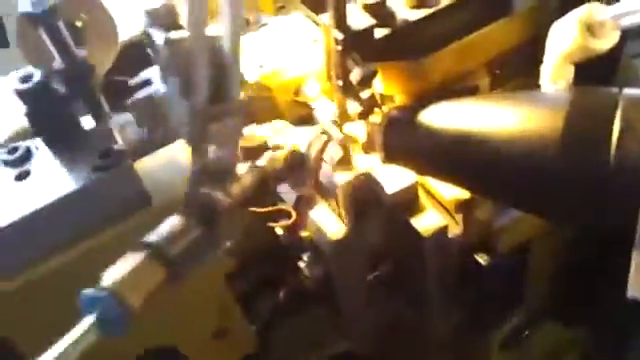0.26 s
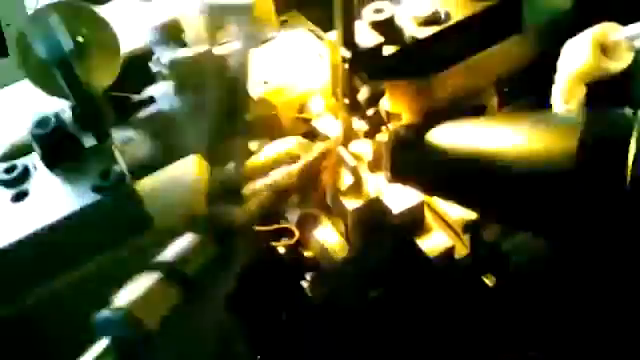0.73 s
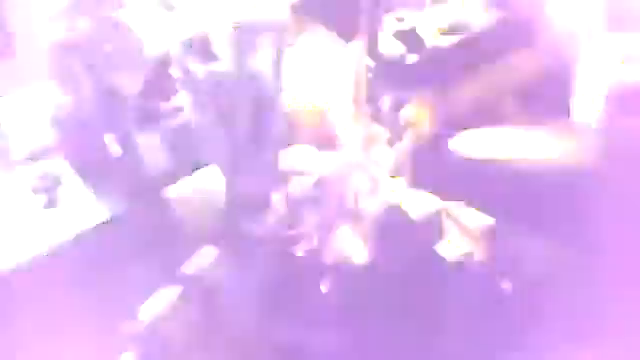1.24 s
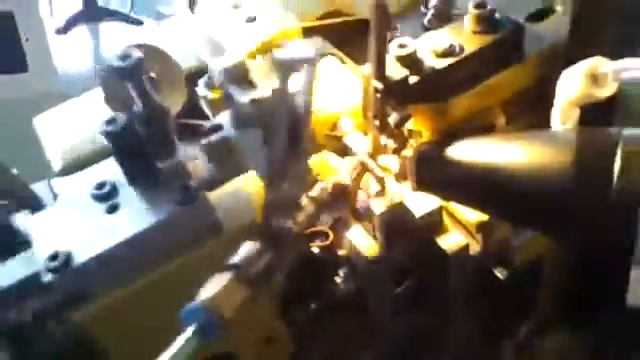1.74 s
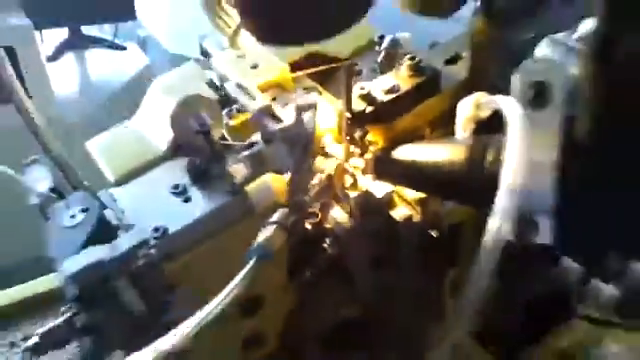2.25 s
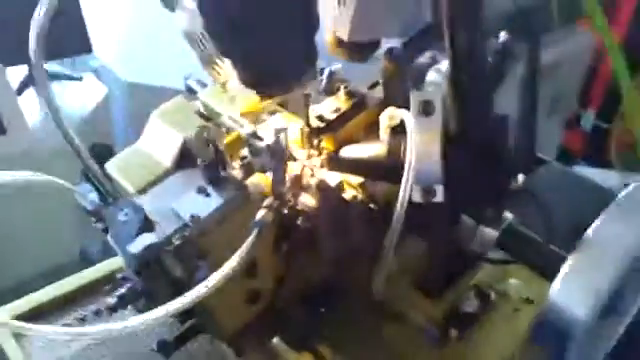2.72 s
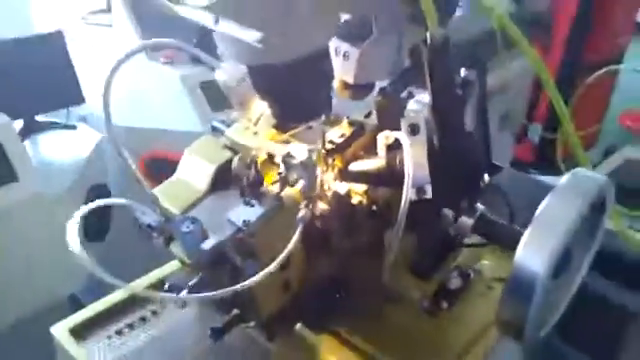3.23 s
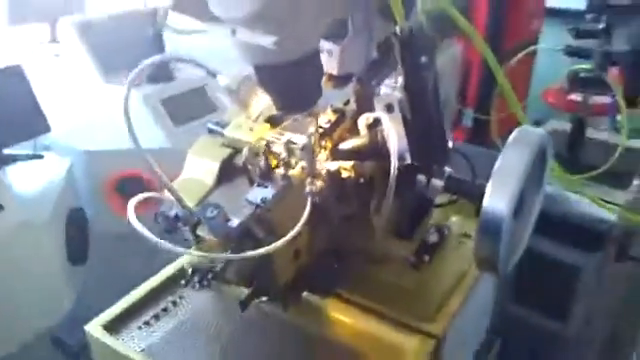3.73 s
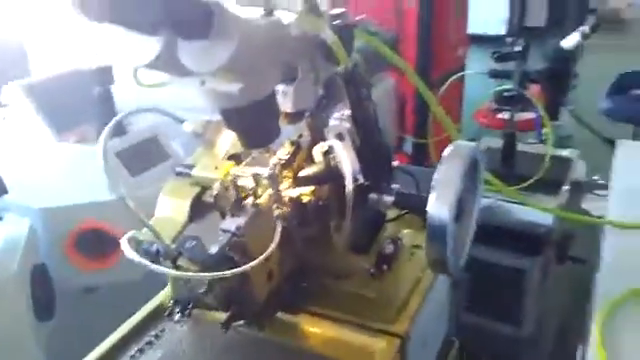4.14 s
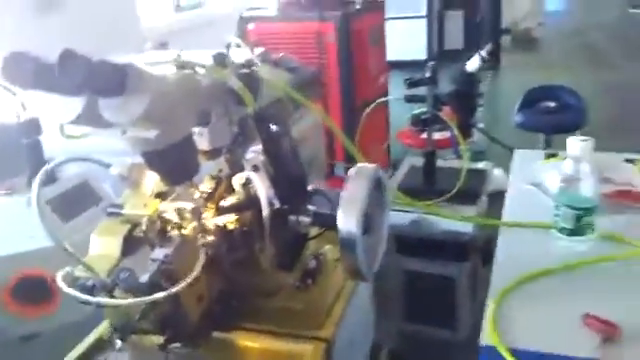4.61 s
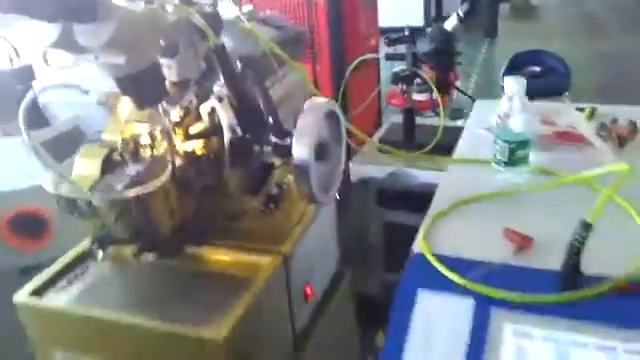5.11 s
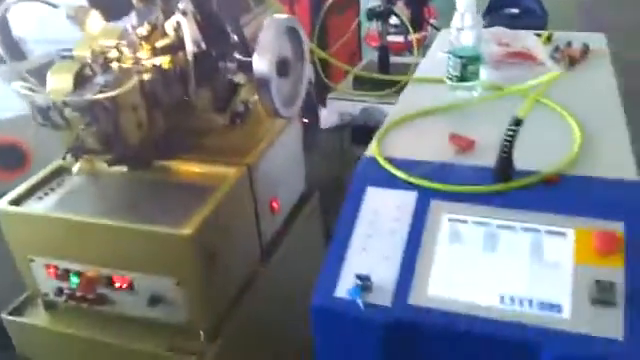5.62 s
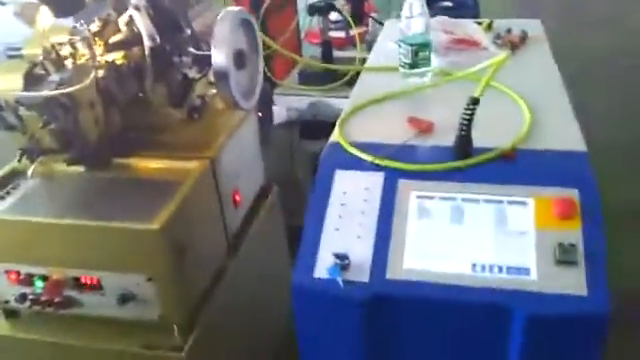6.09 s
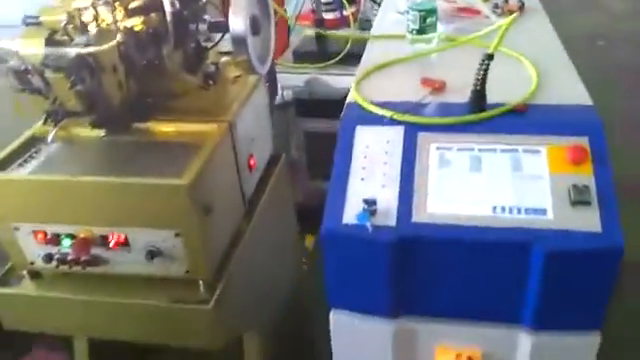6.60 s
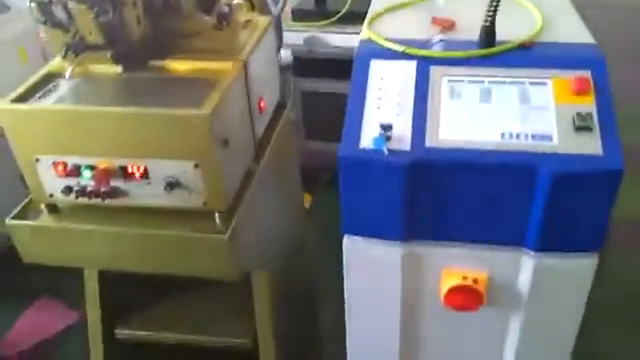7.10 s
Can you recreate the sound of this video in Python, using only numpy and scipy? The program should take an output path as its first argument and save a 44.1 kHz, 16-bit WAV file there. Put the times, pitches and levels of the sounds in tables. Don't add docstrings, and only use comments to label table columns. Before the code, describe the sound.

Loud, dense mechanical clatter from an automatic machine already at full speed: sharp steel cracks, brief high pings, mid-pitched metal knocks and low frame thumps in a fast repeating pattern. Links rattle underneath and an air jet hisses, mostly left. A handheld phone moves back from close range, so the sound loses some weight. The left is crisp and distorted, the right muffled; short reflections surround it and it never stops.

```python
import sys
import numpy as np
from scipy import signal
from scipy.fft import rfft, irfft, next_fast_len
from scipy.io import wavfile
from scipy.ndimage import uniform_filter1d, map_coordinates

SR = 44100
rng = np.random.default_rng(int(sys.argv[2]) if len(sys.argv) > 2 else 0)


def wav_out(sig):
    wavfile.write(sys.argv[1], SR, np.round(np.clip(np.atleast_2d(sig).T, -1, 1) * 32767).astype(np.int16))


def ratio(d):
    e = np.asarray(d, float) / 20
    return 10 ** e


N = 324135
LEAD = SR
TURN_S = .18976


def unit(x):
    return x / np.sqrt(np.mean(x ** 2) + 1e-20)


def along(points, hz, col=1):
    p = np.transpose(points)
    return np.interp(np.log(hz + 1), np.log(p[0] + 1), p[col])


def filtered(x, response):
    m = next_fast_len(x.shape[-1] + SR // 2)
    spectrum = rfft(x, m) * response(np.fft.rfftfreq(m, 1 / SR))
    return irfft(spectrum, m)[..., :x.shape[-1]]


def modes(table, flip=-1):
    def response(f):
        total = 0
        for k, (center, width, db) in enumerate(table):
            damping = 1j * f * width
            total = total + flip ** k * ratio(db) * damping / (center * center - f * f + damping)
        return total
    return response


def pair(geared_share=0):
    # hz, likeness
    port_likeness = [(130, 0.95), (400, 0.4), (800, 0.51), (1500, 0.075), (4000, 0.029)]
    # hz, likeness
    turn_likeness = [(150, .9), (700, .8), (1000, .7), (1700, .55), (3000, .25), (6000, .05)]

    def response(hz):
        angle = np.arccos(np.clip(along(port_likeness, hz), 0, 1)) / 2
        same = geared_share * along(turn_likeness, hz)
        comb = np.sqrt(1 - same ** 2) / (1 - same * np.exp(-2j * np.pi * hz * TURN_S))
        return comb * [np.cos(angle), np.sin(angle)]

    mid, side = filtered(rng.standard_normal((2, N + LEAD)), response)
    return np.array([mid + side, mid - side])


def dying(impulses, t60):
    return np.sqrt(np.abs(signal.lfilter([1], [1, -ratio(-120 / (t60 * SR))], impulses ** 2)))


def blows(play_s=.0005, scatter_s=.00015, scatter_db=1.7):
    # start_s, snap_db, low_slide_db, high_slide_db, thump_db
    cams = np.array([(-.011, 0, -10, -6, -12), (0, 1, 3, 1.5, -1.5), (.012, -9, -3.5, -0.5, -16),
                     (0.022, -4.5, -2, -3.5, 9.5), (.038, -28, -4.5, -1.5, 0), (.064, -7, -1.5, 1.5, 7),
                     (0.0935, 0, 1, 1.5, 7.5), (0.096, -2, -5.5, -1, 10), (.1035, -24, -5, 5, -20),
                     (.1155, -25, -11.5, -1.5, -33), (.127, -37, -6, -3, 14), (.151, -10, -6, -1, 9)], float)
    # pitch_hz, level_db
    struck = np.array([(9830, 20.5), (4850, 9.5), (8580, 7.5), (12550, 13.5), (2630, -20), (11160, 13.5),
                       (4544, 8), (10230, 14), (9060, -2), (2580, -2.5), (10540, 0), (9280, 6.5)], float)
    # start_s, snap_db, pin_hz, pin_db, low_slide_db, high_slide_db, thump_db
    cam = np.hstack([cams[:, :2], struck, cams[:, 2:]])
    first_s = .0095
    turns = first_s + TURN_S * np.arange(-3, N / SR / TURN_S)
    scatter = [scatter_s, scatter_db, 0, *[scatter_db] * 4]
    rows = cam + rng.standard_normal((len(turns), *cam.shape)) * scatter
    rows[..., 0] += (turns + play_s * rng.standard_normal(len(turns)))[:, None]
    return rows.reshape(-1, cam.shape[1])


def train(rows, col):
    at = np.round(rows[:, 0] * SR).astype(int) + LEAD
    return np.bincount(at, ratio(rows[:, col]), N + 2 * LEAD)[:N + LEAD]


def snaps(rows, left_db=-7):
    # pitch_hz, density_db (per Hz)
    crack_color = [(700, -10), (1800, 2), (3000, 2.5), (5000, 2.5), (8000, 9), (12000, 6), (16000, -5)]
    crack = train(rows, col=1)
    sharp = uniform_filter1d(dying(crack, .016), size=140)
    sizzle = uniform_filter1d(dying(crack, 0.18), size=400)
    burst = pair() * (sharp + ratio(-7.0) * sizzle)
    return ratio([[left_db], [0]]) * unit(filtered(burst, lambda hz: ratio(along(crack_color, hz))))


def pins(rows, spread=.03, t60=.028, rise=.0015, count=8):
    t = np.arange(SR // 20) / SR
    chance = rng.standard_normal((len(rows), 2, count, 2))
    pin_hz = rows[:, 2, None, None]
    hz = pin_hz * (1 + spread * pin_hz / 4500 * chance[..., 0])
    ring = np.sin(2 * np.pi * hz[..., None] * t + 0.63 * chance[..., 1:]).sum(axis=2)
    ring = ring * ratio(rows[:, 3, None, None] - 60 * t / t60) * (1 - np.exp(-t / rise))
    at = (np.round(rows[:, :1] * SR).astype(int) + LEAD + np.arange(len(t))).ravel()
    ports = [np.bincount(at, ring[:, c].ravel(), N + 2 * LEAD)[:N + LEAD] for c in (0, 1)]
    return unit(np.array(ports))


def slides(rows, knock_db=-5):
    # pitch_hz, width_hz, level_db
    low_modes = [(661.7, 20.6, 2), (740, 67, -11.5), (786.5, 8.2, -0.5), (859, 21, -2.5), (933.5, 33, 2),
                 (1352, 136, -9.5)]
    # pitch_hz, width_hz, level_db
    high_modes = [(1468, 112, -2.5), (1604, 109, 1), (1984, 660, -8.5), (2480, 2100, -15.5)]

    def drive(hits, t60):
        return unit(pair(1) * dying(hits, t60)) + ratio(knock_db) * unit(hits)

    low = unit(filtered(drive(train(rows, col=4), 0.2), modes(low_modes)))
    high = unit(filtered(drive(train(rows, col=5), 0.18), modes(high_modes)))
    return ratio(-15) * low + ratio(-15.0) * high


def hall(x, count=24):
    # pitch_hz, t60_s
    decay = [(200, 0.34), (2000, 0.47), (10000, 0.22)]
    hz, t, z = signal.stft(rng.standard_normal((count, SR // 2)), SR, nperseg=256)
    tails = signal.istft(z * ratio(-60 * t / along(decay, hz)[:, None]), SR, nperseg=256)[1]
    wet = np.zeros((2, x.shape[1] + SR))
    step = x.shape[1] // count + 1
    for k, tail in enumerate(tails):
        stretch = x[:, k * step:][:, :step]
        part = signal.fftconvolve(stretch, tail[None] / np.linalg.norm(tail), axes=1)
        wet[:, k * step:][:, :part.shape[1]] += part
    return wet[:, :x.shape[1]]


def geared():
    turn = round(SR * TURN_S)
    orders = np.exp(2j * np.pi * rng.random(turn // 2 + 1))
    return unit(np.resize(irfft(orders, turn), N + LEAD))


def frame(rows, thump_db=-14, loose_db=-6):
    # pitch_hz, width_hz, level_db
    frame_modes = [(152.8, 5, -2), (170, 12, -10), (188.5, 10, 0), (228, 8, -6), (255, 16, -9),
                   (289.8, 4, 3), (410.5, 6.5, 1), (436, 8, -2.5), (485, 4.5, -5), (517, 6, -8)]
    shake = geared() + ratio(thump_db) * unit(train(rows, col=6)) + ratio(loose_db) * pair(1)
    return unit(filtered(shake, modes(frame_modes, flip=1)))


def rattle(rate=900, spread_db=3, grain_db=-6):
    # pitch_hz, density_db (per Hz)
    rattle_color = [(60, -30), (130, -20), (340, -5), (590, -54), (1000, -5.5), (2500, 0), (5500, -0.5),
                    (10000, 2), (16000, -15)]
    ticks = (rng.random(N + LEAD) < rate / SR) * ratio(spread_db * rng.standard_normal(N + LEAD))
    swell = 1 + ratio(grain_db) * unit(dying(ticks, 0.006))
    return unit(filtered(pair(1) * swell, lambda hz: ratio(along(rattle_color, hz))))


def jet(right_db=-5, whistle_db=-15):
    # pitch_hz, density_db (per Hz)
    hiss_color = [(1000, 20.5), (2500, 3), (5500, 2.5), (10000, 13.5), (16000, 5)]
    # pitch_hz, width_hz, level_db
    nozzle = [(9520, 47, 0)]
    hiss = unit(filtered(pair(), lambda hz: ratio(along(hiss_color, hz))))
    whistle = unit(filtered(pair(), modes(nozzle)))
    return ratio([[0], [right_db]]) * (hiss + ratio(whistle_db) * whistle)


def low_rumble(rate=7, lumpy_db=3):
    # pitch_hz, density_db (per Hz)
    rumble_color = [(20, 1.5), (60, 2), (110, 1), (150, -30), (300, -120)]
    knots = rng.standard_normal((2, 200))
    wander = np.array([map_coordinates(k, [np.arange(N) * rate / SR]) for k in knots])
    lumps = ratio(lumpy_db * wander)
    return unit(filtered(lumps * rng.standard_normal((2, N)), lambda hz: ratio(along(rumble_color, hz))))


def band_gate(x, uneven_db=6.0, bin_db=0.0):
    # pitch_hz, left_db, right_db
    floor = [(560, -9, -12), (1500, -26, -28), (3500, -15, -23), (5540, -6, -17), (9000, -21, -13),
             (11300, -21, -15), (12200, -9, -16), (12900, -4, -17), (14320, -5, -20)]
    hz, t, z = signal.stft(x, SR, nperseg=2048)

    def wide(bands):
        return np.repeat(bands, 10, axis=1)[:, :len(hz)]

    def above(p, level):
        return 1 / (1 + (level / (p + 1e-20)) ** 6)

    power = np.abs(z) ** 2
    bands = wide(np.add.reduceat(power, np.arange(0, len(hz), 10), axis=1) / 10)
    jumps = unit(uniform_filter1d(wide(rng.standard_normal((2, 103, len(t)))), size=2, axis=2))
    bar_db = np.array([along(floor, hz, c) for c in (1, 2)])[..., None] + uneven_db * jumps
    bar = power.mean(axis=1, keepdims=True) * ratio(2 * bar_db)
    kept = above(bands, bar) * above(power, bar * ratio(2 * bin_db)) * (hz < 14600)[:, None]
    return signal.istft(z * kept, SR, nperseg=2048)[1][:, :N]


def scene():
    rows = blows()
    clatter = ratio(-3.0) * snaps(rows) + ratio([[-13.5], [-17]]) * pins(rows)
    ringing = slides(rows)
    echo = hall(ratio(-2.5) * clatter + ratio(-11.5) * ringing)
    steady = ratio(-14.0) * frame(rows) + ratio(-10.0) * rattle() + ratio(-10) * jet()
    return (clatter + ringing + echo + steady)[:, LEAD:]


def roll_off(x):
    return signal.sosfilt(signal.butter(12, 14850, fs=SR, output="sos"), x)


def record(dry):
    # time_s, distance (0 close, 1 away), left_db, right_db
    walk = [
        (0, 0.08, -0.5, -2.5),
        (1.9, 0.12, -0.3, -3),
        (2.3, 0.4, 0, -1.5),
        (2.55, 0.82, 2, 0.5),
        (3.5, 0.79, 1.8, -1.5),
        (4.2, 1, 2.5, 1.5),
        (5, 0.91, 2, 0),
        (6.2, 0.9, 1, -1.3),
        (7.35, 0.97, 1, 0.5),
    ]
    # pitch_hz, near_db, far_db
    left_port = [(136, -7, -14.5), (161.7, -1.5, -3.5), (318, -5, -12.5), (407, -1, -11), (539.8, -7, -16),
                 (763.6, -2, -3.5), (1090, 0.5, -5.5), (2756, 2.5, 1.5), (3141, 3, -4), (4260, 4, -0.5),
                 (5030, 0, -1.5), (7700, -3, -5), (10200, -1, -8), (13200, 1, -10.5), (14400, 2.5, -9)]
    # pitch_hz, near_db, far_db
    right_port = [(135, -16, -16.5), (161, -3.5, -6.5), (298, -5, -16), (390, 0.5, -15.5), (570, -5, -19.5),
                  (840, -5, -2), (1100, -7, -14.5), (2920, -5.5, -15), (4310, -1, -17),
                  (6100, -21.5, -30.5), (10500, -28, -38.5), (15000, -26, -45)]
    # pitch_hz, level_db
    bass_cut = [(110, -6), (145, 0)]

    def heard(col):
        return filtered(dry, lambda hz: ratio([along(left_port, hz, col), along(right_port, hz, col)]))

    s, far, *level_db = np.transpose(walk)
    t = np.arange(N) / SR
    far = np.clip(np.interp(t, s, far), 0, 1)
    x = (1 - far) * heard(1) + far * heard(2)
    x = x * ratio([np.interp(t, s, db) + 1.0 for db in level_db])
    x = x / (1 + np.abs(x / .945) ** 12) ** (1 / 12)
    x = filtered(x, lambda hz: ratio(along(bass_cut, hz)))
    x = x + ratio([[-34.5], [-44.5]]) * low_rumble()
    return roll_off(band_gate(x))


dry = scene()
out = record(dry)
wav_out(out)
```